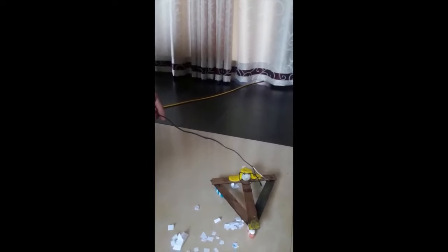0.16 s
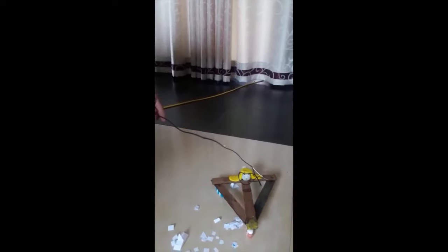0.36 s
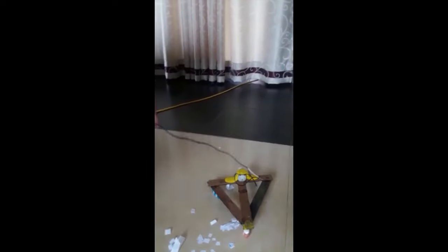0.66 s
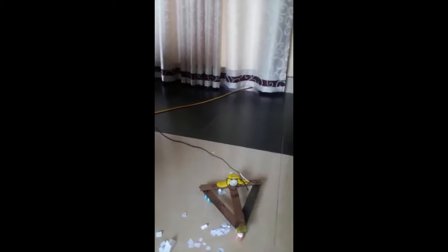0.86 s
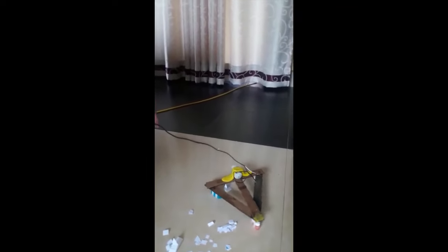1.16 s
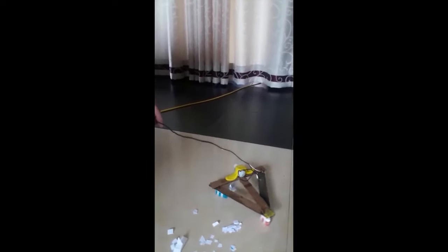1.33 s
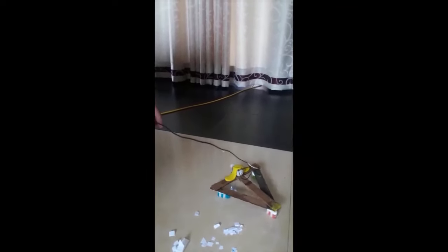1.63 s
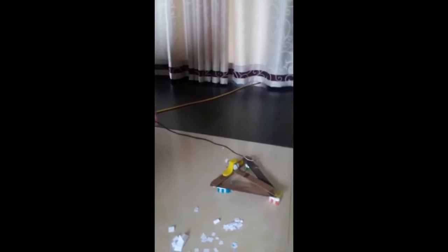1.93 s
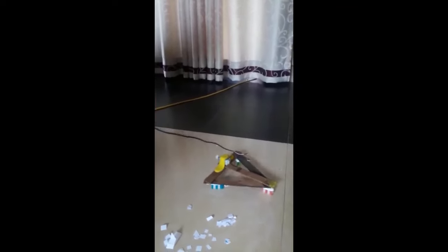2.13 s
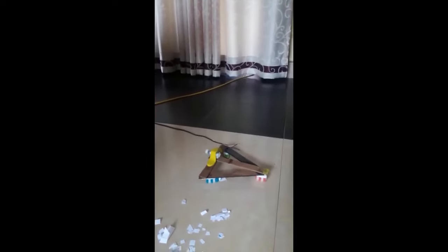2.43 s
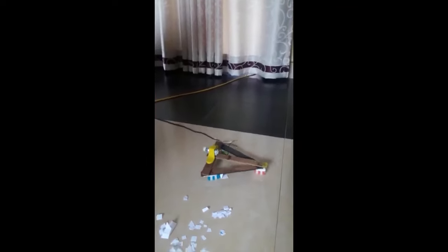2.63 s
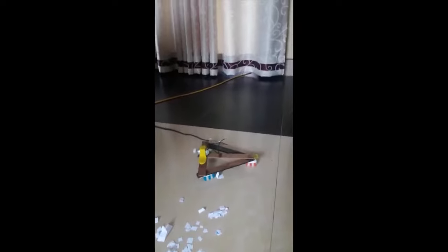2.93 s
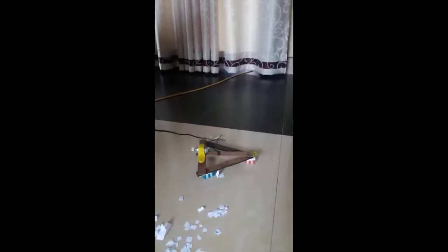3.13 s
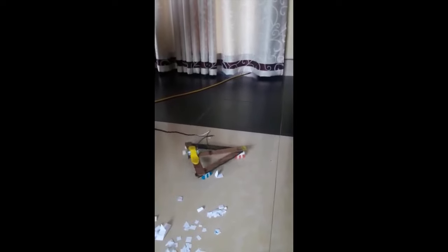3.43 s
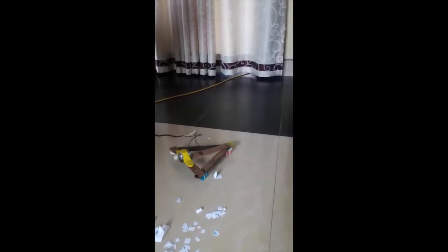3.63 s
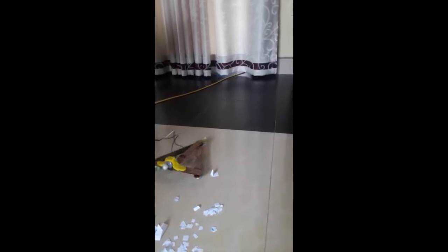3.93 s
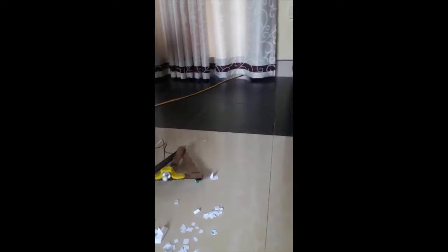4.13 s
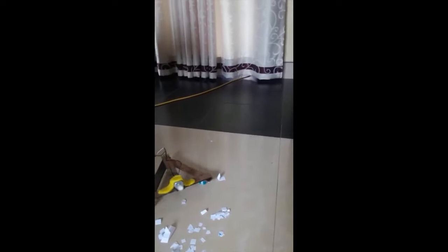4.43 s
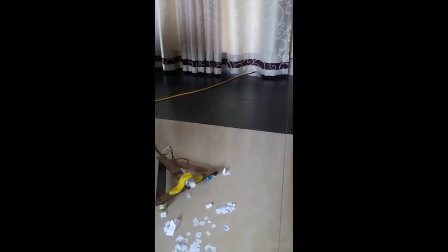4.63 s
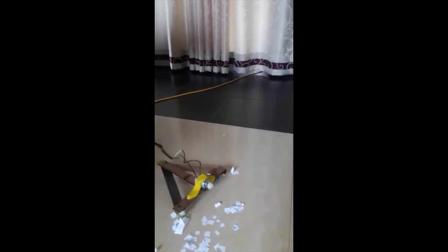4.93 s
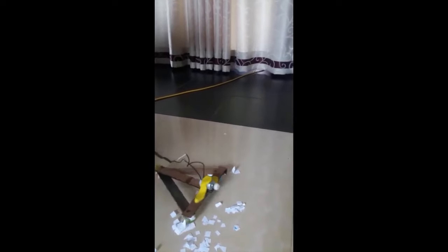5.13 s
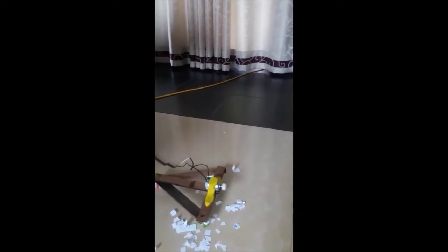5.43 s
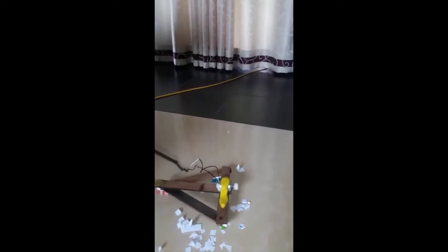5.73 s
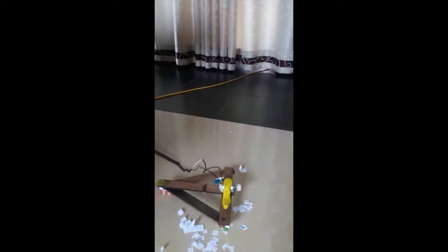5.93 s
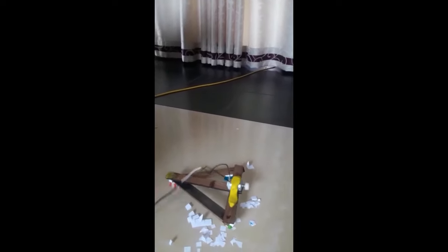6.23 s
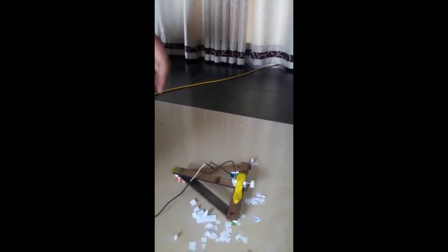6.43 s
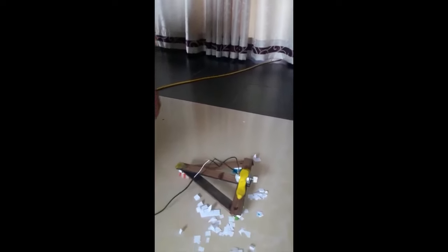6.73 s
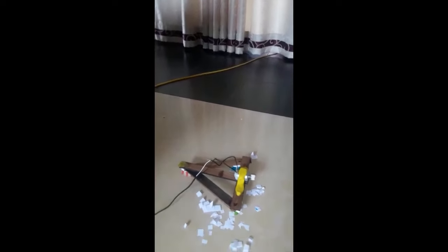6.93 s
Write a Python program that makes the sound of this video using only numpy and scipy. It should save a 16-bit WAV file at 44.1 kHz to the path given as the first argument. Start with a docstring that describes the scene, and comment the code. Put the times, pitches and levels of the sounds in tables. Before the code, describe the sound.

Nearly constant nasal motor buzz with a thin high whine, wavering as the device moves around a reverberant tiled room. A few light ticks, then a hard door slam with a low boom early on; dry scuffs and wooden knocks midway. Brush noise and rattling thicken later, until the motor stops abruptly. A sharp plastic clack with tiny bounces and faint cord rustle end it, picked up nearby over quiet room rumble.

```python
"""A small electric motor drives a wooden toy in circles over a tiled floor: shaft orders summed as sines,
fading with the room's standing waves, over brush clicks, chatter and scrape noise. Small things tick
(filtered noise bursts); at 0.72 s a door bangs (latch, blows, ringing modes, wash); at 3.17 s the frame knocks.
A squeak at 5.53 s; at 6.1 s the motor is cut off and coasts; a plastic piece drops and bounces (6.23 s);
something rustles (swelling noise). Rumble and room air lie under everything."""
import sys
import numpy as np
from scipy import signal
from scipy.fft import rfft, irfft, next_fast_len
from scipy.io import wavfile
from scipy.ndimage import uniform_filter1d

SR = 44100
rng = np.random.default_rng(int(sys.argv[2]) if len(sys.argv) > 2 else 0)


def wav_record(signal):
    """Record a signal, one row per channel, as 16-bit PCM in the file named by sys.argv[1]."""
    frames = np.transpose(np.atleast_2d(signal))
    bounded = np.clip(frames, -1, 1)
    # unit amplitude maps onto the largest positive 16-bit level
    quanta = np.round(bounded * 32767).astype(np.int16)
    wavfile.write(sys.argv[1], SR, quanta)


N = 311787
STEP = 256  # samples per motor control frame
TOP_HZ = 15780  # band limit

# All noise spectra are relative: hiss() sets rms to 1.
# far traffic and house hum, rms: t/s, level/dB
RUMBLE_LEVEL = [(0, -55.5), (.68, -58), (1.3, -62.5), (1.85, -64.5), (3, -68), (3.3, -52.5), (3.5, -63),
                (4.6, -58), (5.2, -59.5), (6, -61.5), (7.07, -60.5)]
# its spectrum: f/Hz, density/(dB per Hz)
RUMBLE_SPECTRUM = [(15, -45), (25, -28.5), (85, -1), (124, -3.5), (155, 0), (184, -3.5), (264, -8.5),
                   (448, -17.5), (487, -22), (700, -33.5), (910, -67), (1540, -120)]
# still room spectrum: f/Hz, density/(dB per Hz)
AIR_SPECTRUM = [(180, 1), (300, -5), (446, -10), (866, -3.5), (910, -20.5), (1380, -47), (2810, -5),
                (3540, -12), (7090, -4.5), (8370, -27.5), (15700, -3.5)]
# channel difference spectrum: f/Hz, relative density/dB
SIDE_SPECTRUM = [(30, -8.5), (120, -5), (400, -10.0), (900, -14.0), (1300, -37.5), (16000, -36.5)]
# decay of the room: f/Hz, t60/s
ROOM_DECAY = [(100, 1), (300, 0.61), (1000, 0.55), (3000, 0.53), (8000, 0.4), (15000, 0.37)]

# rustle: t/s, middle band level/dB, low and high band re middle/dB
RUSTLE_LEVELS = [(6.38, -72.5, 13, 0), (6.45, -52, 1.5, 1), (6.5, -55, -20, -18), (6.57, -57, -5, -20),
                 (6.6, -72.5, 2.5, -18), (6.815, -61, -7.5, -4.5), (6.845, -54.5, -16, 4.5),
                 (6.91, -51.5, -6.5, -6), (7.07, -50, -6.5, -6)]
# its three bands: f/Hz, relative density/dB
RUSTLE_MIDDLE = [(1800, -40), (3000, -2), (4500, 0), (7000, -4), (8200, -30)]
RUSTLE_LOW = [(500, -30), (1000, -3), (1800, 0), (2600, -8), (3500, -40)]
RUSTLE_HIGH = [(7000, -37.5), (8500, -3.5), (12000, -6), (16000, -2)]

# brief squeak: start/s, end/s, f/Hz, peak level/dB
SQUEAKS = [(5.532, 5.567, 3800, -43)]
# gritty scuffs of the frame, wavering low hums: start/s, end/s, f/Hz, single-stage width/Hz,
# level before envelope/dB
SCUFFS_AND_HUMS = [(-.2, .68, 522, 26, -59), (.25, 0.54, 4300, 250, -52.5), (2.203, 2.308, 480, 320, -58.5),
                   (2.173, 2.32, 2890, 1600, -54), (3.13, 3.16, 1220, 470, -51),
                   (3.17, 3.265, 910, 330, -45.5), (3.175, 3.36, 1534, 270, -46.5),
                   (3.176, 3.244, 3400, 820, -51), (3.52, 3.741, 1640, 280, -52),
                   (5.05, 5.4, 3080, 810, -58), (6.449, 6.662, 4200, 1400, -53.5),
                   (6.737, 6.852, 3250, 350, -62.5), (6.9, 7.2, 1800, 420, -64.5),
                   (4.901, 6.305, 154.3, 20.1, -58), (6.358, 7.294, 155.2, 11, -63.5)]
# small ticks: t/s, dry peak level/dB, f/Hz, single-stage width/Hz
TICK_HITS = [(0.3673, -27, 4200, 2440), (.596, -28.5, 3050, 1490), (.615, -29.5, 2950, 1500),
             (.699, -21, 1995, 2980), (2.24, -34.5, 1680, 600), (2.676, -30.5, 4900, 2500),
             (.979, -45, 1798, 800)]
# bumps of the wooden frame: t/s, level/dB, upper modes re lowest/dB
FRAME_KNOCKS = [(3.166, -30.5, 3), (3.19, -33.5, -1), (3.228, -35, -21)]
# frame modes, lowest first: f/Hz, relative level/dB, t60/s
FRAME_MODES = [(302.5, -3, 0.23), (1006, 0.5, 0.04), (1533, -8.5, 0.048), (2050, -13, 0.033)]

# bounces of the plastic piece: t/s, relative body level/dB, relative edge level/dB
BOUNCES = [(6.226, -1.5, -23), (6.237, -40, -40), (6.249, -26.5, -35), (6.265, -16.5, -29.5),
           (6.288, -27.5, -41), (6.339, -26, -41.5), (6.345, -27.5, -41), (6.412, -25, -42),
           (6.434, -49, -49.5)]
# resonances of the piece: f/Hz, single-stage width/Hz, relative level/dB
PLASTIC_MODES = [(650, 320, -1.5), (865, 345, -0.5), (1070, 270, 0), (1430, 340, 2.5), (2290, 180, 0),
                 (3960, 740, 1.5), (5130, 3500, -1), (6550, 1600, -12)]

# leaf, frame, rebounds: t/s, relative level/dB, t60/s, centre f/Hz
DOOR_BLOWS = [(0.7234, -11.5, 0.021, 2465), (0.733, -5.5, 0.022, 500), (.752, -17, .04, 1195),
              (.765, -19, 0.025, 1820)]
# door boom: f/Hz, relative level/dB, t60/s
BOOM_MODES = [(108.6, -11, 0.48), (152.5, -2.5, 0.82), (213, -10, 0.22), (257, 3, 0.32), (391, -8, 0.8),
              (584, 6, 0.21), (675, -10.5, 0.15), (861, -4.5, 0.17)]
# colour of the blows: f/Hz, relative level/dB
BLOW_COLOUR = [(24, -55), (40, -32.5), (74, -32.5), (147, 4.5), (218, 0.5), (261, -13), (314, -0.5),
               (386, -12.5), (519, -1), (582, -7), (624, -3), (2000, -15.5), (6900, -40), (8670, -55),
               (9500, -76.5), (12400, -81), (20900, -120)]
# colour of the walls' dense answer: f/Hz, relative level/dB
WASH_COLOUR = [(40, -37), (80, -17), (150, 6.5), (300, -1.5), (600, -1), (1200, -14), (2500, -13.5),
               (4500, -22), (8000, -44), (12000, -79)]
LATCH_S = .7193

# shaft speed: t/s, turns per s
SHAFT_SPEED = [(0, 161.1), (.3, 160.8), (.68, 161), (1.04, 161.4), (1.35, 161.25), (1.75, 161.55),
               (2.25, 161.45), (2.58, 160.95), (2.8, 161.45), (3.13, 161.4), (3.3, 161), (3.87, 161.1),
               (4, 161.4), (4.3, 161.3), (4.65, 161.55), (5, 161.55), (5.09, 161.85), (5.5, 162),
               (6.09, 162.55)]
# motor loudness: t/s, relative level/dB, then whine re that level/dB around each of BAND_CENTRES_HZ
MOTOR_LEVELS = [(0.0, 1.1, 0.4, 2.5, 0.1, -3.1), (0.35, 3, 1.2, 2.5, -2, -1.8),
                (0.63, 1.5, 0.83, 5, -3, -1.2), (1.05, -1, 1.4, 2.5, 1.5, -2.5), (1.5, -2.5, 1, 4, 1.5, -1),
                (2.0, -4, 3.7, 1.5, -2, 4.5), (2.5, -3.5, 3.4, -0.2, -2, 1), (3.09, -3.5, 8, 0, 5.5, 2),
                (3.33, 2, 3.4, -3.5, 0.4, 2.5), (3.7, 1.7, 2.2, -5, -2, 0), (4.1, 1.5, 2.9, -1.5, 2.8, 2),
                (4.5, 2.5, 2.6, 0, 4.5, 1.2), (4.9, 1.4, 0.66, 0, 2, 0.5),
                (5.3, 1.5, 0.93, -0.8, -3.5, 2.5), (5.7, 0.5, 3, 1, 1.5, 3.5),
                (6.09, 0.2, 2.7, 6.5, -3, 2.5)]
# centres of the whine bands: f/Hz
BAND_CENTRES_HZ = [5500, 9900, 12000, 14500]
# higher orders: f/Hz, relative level/dB
WHINE_LEVELS = [(1470, -32), (2500, -3.5), (2830, -4), (3560, -6.5), (4450, -12.5), (5520, -12.5),
                (6540, -10), (7000, -5.5), (8230, -19.5), (9750, -2), (10900, -11.5), (11500, -4),
                (13700, -9.5), (14700, 0.5), (15700, -15.5)]
# low orders of the frame's hum: order, rms level before MOTOR_LEVELS and ROOM_FADES/dB
HUM_ORDERS = [(2, -79.5), (3, -71.5), (4, -81), (5, -57), (6, -75.5), (7, -54), (8, -66.5), (9, -53),
              (10, -53.5), (11, -49), (12, -58), (13, -57.5), (14, -57.5), (15, -61.5), (16, -59.5),
              (17, -62.1), (18, -63), (19, -63), (20, -65), (21, -67.5), (22, -65), (23, -67.5)]
# a hum order meets a null or crest of the standing waves: t/s, order, half length/s, change/dB
ROOM_FADES = [(0.05, 14, 0.88, -9), (0.099, 12, 0.5, 1.5), (0.1, 17, 0.5, 2.5), (0.101, 23, 0.6, 6),
              (0.2, 9, 0.5, 3), (0.35, 16, 0.08, -18), (0.397, 3, 1, 11), (0.42, 11, 0.44, -5.5),
              (1.06, 10, 0.089, -22), (1.07, 15, 0.6, -10.5), (1.21, 9, 0.25, -6), (1.233, 7, 1, 2),
              (1.28, 18, 0.4, -8.5), (1.319, 12, 0.25, -15), (1.351, 11, 0.32, 1), (1.7, 18, 0.4, -6),
              (1.81, 10, 0.48, -9), (1.9, 19, 0.3, -9), (2.093, 11, 0.21, -10.5), (2.17, 5, 0.23, -8.5),
              (2.27, 13, 0.05, -13), (2.555, 18, 0.33, 8.5), (2.604, 3, 0.91, -5.5), (2.6, 13, 0.2, 6),
              (2.903, 10, 0.15, -9), (3.35, 15, 0.15, -10), (3.357, 18, 0.14, 9.5), (3.375, 11, 0.21, 3.5),
              (3.37, 12, 0.08, -13), (3.4, 14, 0.16, 3.5), (3.4, 20, 0.2, 8), (3.55, 13, 0.72, 6.5),
              (3.6, 6, 0.9, 14.5), (3.596, 7, 0.4, -6.5), (3.745, 12, 0.21, 5), (3.956, 5, 0.36, 5),
              (4.02, 10, 0.33, 3.9), (4.026, 11, 0.13, -16.0), (4.1, 17, 0.2, -8), (4.13, 16, 0.25, -24),
              (4.37, 12, 0.25, -20), (4.414, 9, 0.19, -8.1), (4.457, 19, 0.21, -22), (4.713, 14, 0.15, 4.9),
              (4.803, 11, 0.25, 3.5), (4.997, 3, 0.73, 9), (5.033, 10, 0.05, -21), (5.184, 7, 0.16, -18),
              (5.5, 11, 0.3, -4.5), (5.69, 15, 0.74, 9.5), (5.76, 17, 0.79, 5.5), (5.986, 13, 0.052, -6),
              (6.034, 9, 0.11, 7.5), (6.04, 16, 0.27, 10)]
# brush swells over the steady click: start/s, end/s, level/dB
BRUSH_BURSTS = [(0, .58, -55.5), (1.05, 1.25, -61), (3, 3.2, -63), (4.1, 4.75, -44.5)]
# loose-part bursts: start/s, end/s, lower resonance level/dB, upper resonance level/dB
RATTLE_BURSTS = [(.27, .6, -64, -72), (1.092, 1.246, -60, -62), (2.3, 3, -62, -74),
                 (3.051, 3.16, -55.5, -53), (3.172, 3.3, -58, -58), (4.324, 4.67, -47, -57),
                 (5.52, 5.72, -54.5, -60)]
# frame sliding on the tiles, before its pulsing: t/s, scrape level/dB
SLIDE_LEVEL = [(0, -70), (.28, -52), (.54, -49), (.62, -49), (1.08, -61), (1.15, -52), (1.6, -57.5),
               (2.9, -67), (3.08, -54.5), (3.16, -47.5), (3.25, -44.5), (3.35, -51), (4, -53.5),
               (4.47, -50), (4.6, -53.5), (5.3, -52.5), (6.05, -58.5), (6.12, -56), (6.2, -62), (6.4, -99)]
# scrape spectrum: f/Hz, density/(dB per Hz)
SCRAPE_SPECTRUM = [(250, -35.5), (400, -12.5), (750, -4.5), (1300, -7), (1600, -3.5), (2200, -3.5),
                   (3500, -4.5), (5000, -2), (7000, -6.5), (8300, -21), (9600, -13), (11000, -10),
                   (12000, -24.5), (15700, -24)]
# slowing shaft blurred in the can's fixed resonances: f/Hz, density/(dB per Hz)
COAST_SPECTRUM = [(240, -46), (400, -16), (644, -35), (739, -18), (990, -7), (1140, -12), (1590, 0),
                  (3430, -15), (3880, -4), (5440, -13), (7070, -10), (8370, -16), (12900, -13), (14100, -7),
                  (15700, -13)]
WHINE_DB, BRUSH_DB = -58, -58.5  # whine reference, steady click
RATTLE_DB, UPPER_DB = -61, -63  # steady chatter, lower and upper resonance
CUT_S, CUT_DB_PER_S, STOP_S = 6.1, -1200, 6.33
COAST_DB, COAST_DB_PER_S = -40, -63  # at the cut, before envelope; then its slope


def amp(db):
    """Gain of a level."""
    return 10 ** (np.asarray(db) / 20)


def unit(x):
    """Scaled to rms 1."""
    return x / np.sqrt(np.mean(np.abs(x) ** 2) + 1e-20)


def smooth(x, size):
    """Moving average over size samples."""
    return uniform_filter1d(x, size=size)


def along(points, hz):
    """(Hz, value) points interpolated on a log frequency axis."""
    f, v = np.transpose(points)
    return np.interp(np.log(hz + 1), np.log(f + 1), v)


def curves(rows, step=1):
    """One value every step samples for each column after the time."""
    s, *cols = np.transpose(rows)
    t = np.arange(0, N + step - 1, step) / SR
    return np.array([np.interp(t, s, c) for c in cols])


def filtered(x, response):
    """x times a complex response of frequency."""
    m = 2 * next_fast_len(len(x) // 2 + SR // 4)
    return irfft(rfft(x, m) * response(np.fft.rfftfreq(m, 1 / SR)), m)[:len(x)]


def peak(f, hz, width_hz):
    """One causal resonance."""
    return 1j * f * width_hz / (hz * hz - f * f + 1j * f * width_hz)


def causal(spectrum):
    """Minimum-phase response with these levels."""
    def response(hz):
        c = irfft(np.log(amp(along(spectrum, hz)) + 1e-6))
        c[1:len(c) // 2] *= 2
        c[len(c) // 2 + 1:] = 0
        return np.exp(rfft(c))
    return response


def hiss(spectrum, patchy_db):
    """Noise of rms 1 with time-frequency patches of random gain."""
    z = signal.stft(rng.standard_normal(N), nperseg=512)[2]
    field = uniform_filter1d(rng.standard_normal(z.shape), size=6, axis=0)
    field = uniform_filter1d(field, size=12, axis=1)
    x = signal.istft(z * amp(patchy_db * unit(field)), nperseg=512)[1][:N]
    return unit(filtered(x, lambda hz: amp(along(spectrum, hz))))


def snap(t, t60):
    """A dying noise burst whose energy is set by t60 alone."""
    shape = amp(-60 * t / t60)
    x = shape * rng.standard_normal(len(t))
    return x * np.linalg.norm(shape) / np.linalg.norm(x)


def ring(modes, t):
    """Decaying sine modes, each struck at a slightly random strength."""
    scatter_db = 1.5
    x = 0
    for hz, db, t60 in modes:
        x = x + amp(db + rng.normal(0, scatter_db) - 60 * t / t60) * np.sin(2 * np.pi * hz * t)
    return x


def swell(a, b):
    """Rises after a, dies before b."""
    phase = np.clip((np.arange(N) / SR - a) / (b - a), 0, 1)
    return np.abs(np.sin(np.pi * phase)) ** 0.48


def bursts(rows, steady_db):
    """A steady gain with swells (start/s, end/s, level/dB) on top."""
    return amp(steady_db) + sum(amp(db) * swell(a, b) for a, b, db in rows)


def room(x, wet_db):
    """x plus a fresh random tail in which each frequency dies at its own rate."""
    hz, t, z = signal.stft(rng.standard_normal(SR), SR, nperseg=256)
    decay = amp(-60 * t / along(ROOM_DECAY, hz)[:, None])
    tail = signal.istft(z * decay, SR, nperseg=256)[1]
    delayed = np.pad(x, (130, 0))  # 3 ms
    return x + amp(wet_db) * signal.fftconvolve(delayed, tail / np.linalg.norm(tail))[:N]


def background():
    """Far traffic and house hum as slowly varying low noise, plus steady room air."""
    rumble = amp(curves(RUMBLE_LEVEL)[0]) * hiss(RUMBLE_SPECTRUM, patchy_db=1)
    return rumble + amp(-59.5) * hiss(AIR_SPECTRUM, patchy_db=5.0)


def rustle():
    """Soft dragging of cord or cloth: three noise bands that come and go."""
    db, low_db, high_db = curves(RUSTLE_LEVELS)
    middle = hiss(RUSTLE_MIDDLE, patchy_db=1.8)
    low = hiss(RUSTLE_LOW, patchy_db=1.8)
    high = hiss(RUSTLE_HIGH, patchy_db=0.5)
    return amp(db) * (middle + amp(low_db) * low + amp(high_db) * high)


def squeak_scuffs_hums():
    """A sine squeak, and lumpy noise swelling in single resonances."""
    t = np.arange(N) / SR
    x = np.zeros(N)
    for a, b, hz, db in SQUEAKS:
        x += amp(db) * swell(a, b) * np.sin(2 * np.pi * (hz * t + rng.random()))
    for a, b, hz, width_hz, db in SCUFFS_AND_HUMS:
        noise = rng.standard_normal(N)
        grit = noise * amp(1.6 * unit(smooth(rng.standard_normal(N), 150)))
        x += amp(db) * swell(a, b) * unit(filtered(grit, lambda f: peak(f, hz, width_hz) ** 2))
    return x


def ticks_and_knocks():
    """Ticks as resonant noise bursts; frame bumps as struck modes; both in the room."""
    x, t = np.zeros(N), np.arange(SR // 4) / SR
    for s, db, hz, width_hz in TICK_HITS:
        tick = filtered(snap(t, 0.0079), lambda f: peak(f, hz, width_hz) ** 2)
        x[round(s * SR):][:len(t)] += amp(db) * tick / np.abs(tick).max()
    for s, db, upper_db in FRAME_KNOCKS:
        bump = ring(FRAME_MODES[:1], t) + amp(upper_db) * ring(FRAME_MODES[1:], t)
        x[round(s * SR):][:len(t)] += amp(db) * bump
    return room(x, wet_db=-11.5)


def plastic_drop():
    """Each bounce is a short crack into the piece's broad resonances, with a bright edge."""
    body, edge, t = np.zeros(N), np.zeros(N), np.arange(2000) / SR
    for s, db, edge_db in BOUNCES:
        body[round(s * SR):][:len(t)] += amp(db) * snap(t, 0.011)
        edge[round(s * SR):][:len(t)] += amp(edge_db) * snap(t, 0.012)

    def plastic(f):
        modes = sum(amp(db) * peak(f, c, w) ** 2 for c, w, db in PLASTIC_MODES)
        return modes / (1 + (f / 8000) ** 8) / (1 + (430 / (f + 1)) ** 6)

    body = amp(4.5) * filtered(body, plastic)
    edge = amp(8.0) * filtered(edge, lambda f: peak(f, 13000, 8000) ** 2)
    return room(body, wet_db=-0.5) + room(edge, wet_db=-1.5)


def door():
    """Latch click, splintery blows, one short 1600 Hz ring, the boom of the leaf and a wall wash."""
    crack, near, boom, thud = np.zeros((4, N))
    t = np.arange(SR) / SR
    for s, db, t60, hz in DOOR_BLOWS:
        blow = filtered(amp(db) * snap(t, t60), lambda f: .5 + peak(f, hz, hz) * (hz / 1000) ** 2.1)
        crack[round(s * SR):][:SR] += blow
    latch = filtered(snap(t, 0.0067),
                     lambda f: (peak(f, 1980, 2000) + peak(f, 5800, 3000)) / (1 + (f / 7600) ** 12))
    near[round(LATCH_S * SR):][:SR] = .4 * latch / np.abs(latch).max()
    shut = round((LATCH_S + .003) * SR)
    near[shut:][:SR] += .62 * np.exp(-((t - .003) / .0016) ** 2) * np.sin(2 * np.pi * 1600 * t)
    boom[shut:][:SR] = amp(-20.0) * ring(BOOM_MODES, t) * (1 - np.exp(-t / 0.004))
    thud[shut:][:SR] = rng.standard_normal(SR) * amp(-60 * t / 0.4) * (1 - np.exp(-t / 0.0086))
    blows = amp(18.5) * filtered(crack, causal(BLOW_COLOUR))
    wash = amp(-3.5) * filtered(thud, causal(WASH_COLOUR))
    return room(blows, wet_db=-5.5) + room(near, wet_db=-6.5) + room(boom, wet_db=-13.0) + wash


def scrape(turns):
    """The frame sliding on the tiles: noise pulsing twice a turn."""
    pulsing = 1 + 0.45 * np.cos(4 * np.pi * turns)
    return amp(curves(SLIDE_LEVEL)[0]) * hiss(SCRAPE_SPECTRUM, patchy_db=2.5) * pulsing


def coasting():
    """The unpowered shaft slows: its orders blur into noise in the can's resonances."""
    level_db = COAST_DB + COAST_DB_PER_S * (np.arange(N) / SR - CUT_S)
    return amp(level_db) * swell(CUT_S - .015, STOP_S) ** .4 * hiss(COAST_SPECTRUM, patchy_db=0)


def chatter(turns):
    """A loose part chatters in one part of each turn: gated noise in two resonances."""
    jitter = .3 * unit(smooth(rng.standard_normal(N), 200))
    gate = np.exp(0.97 * np.cos(2 * np.pi * turns - 2.2) + jitter)
    lower = filtered(gate * rng.standard_normal(N), lambda f: peak(f, 4230, 1000) ** 2)
    upper = filtered(gate * rng.standard_normal(N), lambda f: peak(f, 6160, 2200) ** 2)
    lower_gain = bursts([(a, b, db) for a, b, db, _ in RATTLE_BURSTS], RATTLE_DB)
    upper_gain = bursts([(a, b, db) for a, b, _, db in RATTLE_BURSTS], UPPER_DB)
    return lower_gain * unit(lower) + upper_gain * unit(upper)


def brush(turns):
    """A brush snaps over a commutator gap once a turn and rings the steel can (orders 58-89)."""
    click = sum(amp(-6 * ((k - 74.5) / 5) ** 2) * np.cos(2 * np.pi * k * turns) for k in range(58, 90))
    click *= 1 + .2 * unit(smooth(rng.standard_normal(N), 300))  # no two snaps are alike
    return bursts(BRUSH_BURSTS, BRUSH_DB) * unit(click)


def whine(turns, fade_s=0.18, steady=0.71, spread_db=2, waver=.1, loose=0.65):
    """Every shaft order is a clean line; moving through the room fades and turns each one slowly."""
    level_db, *bands_db = curves(MOTOR_LEVELS, step=STEP)
    count = len(level_db)
    frames, fine = np.arange(count), np.arange(N) / STEP
    frame_s = frames * STEP / SR
    hum = {round(k): db for k, db in HUM_ORDERS}
    spin, x = np.exp(2j * np.pi * turns), np.zeros(N)
    order = spin
    for k in range(2, 98):
        order = order * spin
        span = max(int(fade_s * SR / STEP * (20 / k) ** 0.45), 2)  # short waves fade faster
        a, b = smooth(smooth(rng.standard_normal((2, count)), span), span)
        flutter = 0.5 * unit(smooth(rng.standard_normal(count), 2)) * min(k / 40, 1)
        start = np.exp(2j * np.pi * (rng.random() - .5))
        if k in hum:
            room_db = sum(db * np.exp(-((frame_s - s) / half_s) ** 2)
                          for s, n, half_s, db in ROOM_FADES if round(n) == k)
            size = np.sqrt(2) * amp(hum[k] + level_db + room_db)
            size = size * (1 + waver * k / 10 * unit(b)) * np.exp(.6j * unit(a))
            size = size * start ** loose  # one jolt a turn keeps the orders roughly in step
        else:
            hz = k * SHAFT_SPEED[0][1]
            band_db = sum(np.interp(hz, BAND_CENTRES_HZ, own) * db
                          for own, db in zip(np.eye(len(bands_db)), bands_db))
            # direct path plus shifting echoes
            fade = (steady + unit(a + 1j * b)) * np.exp(1j * flutter) * start
            order_db = WHINE_DB + along(WHINE_LEVELS, hz) + spread_db * rng.standard_normal()
            size = amp(order_db + level_db + band_db) * fade
        gain = np.interp(fine, frames, size.real) + 1j * np.interp(fine, frames, size.imag)
        x += (order * gain).real
    return x


def motor():
    """Whine, brush and chatter die at the cut; scrape and coasting are added outside it."""
    turns = np.cumsum(curves(SHAFT_SPEED)[0]) / SR
    powered = amp(CUT_DB_PER_S * np.clip(np.arange(N) / SR - CUT_S, 0, 1))
    return powered * (whine(turns) + brush(turns) + chatter(turns)) + scrape(turns) + coasting()


def scene():
    """All sources summed; the two channels differ by a trace of noise, mostly low."""
    mid = background() + motor() + door() + plastic_drop() + ticks_and_knocks()
    mid = mid + squeak_scuffs_hums() + rustle()
    side = amp(-79) * hiss(SIDE_SPECTRUM, patchy_db=6.5)
    return np.array([mid + side, mid - side])


def record(dry):
    """Rounds off the highest peaks and keeps nothing from TOP_HZ up."""
    rounded = dry / (1 + np.abs(dry / .93) ** 6) ** (1 / 6)
    return np.array([filtered(x, lambda hz: hz < TOP_HZ) for x in rounded])


dry = scene()
out = record(dry)
wav_record(out)
```